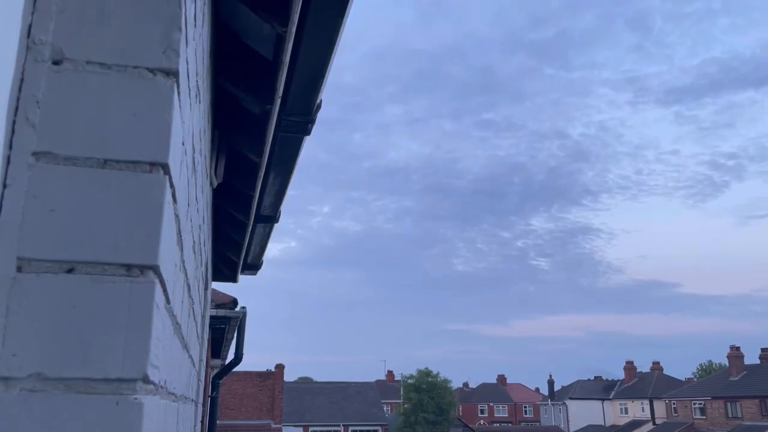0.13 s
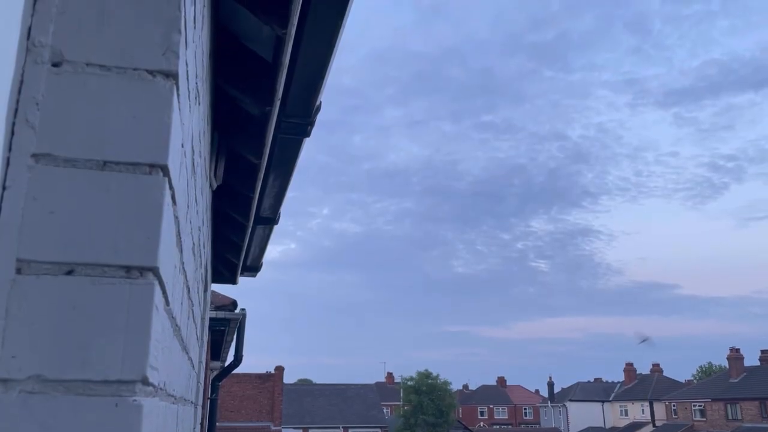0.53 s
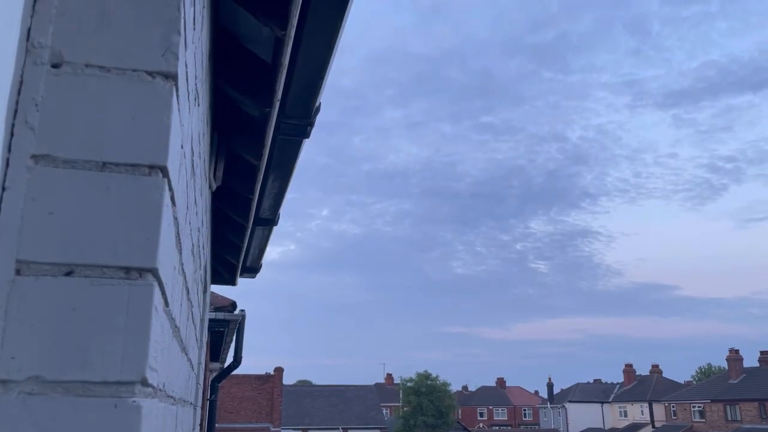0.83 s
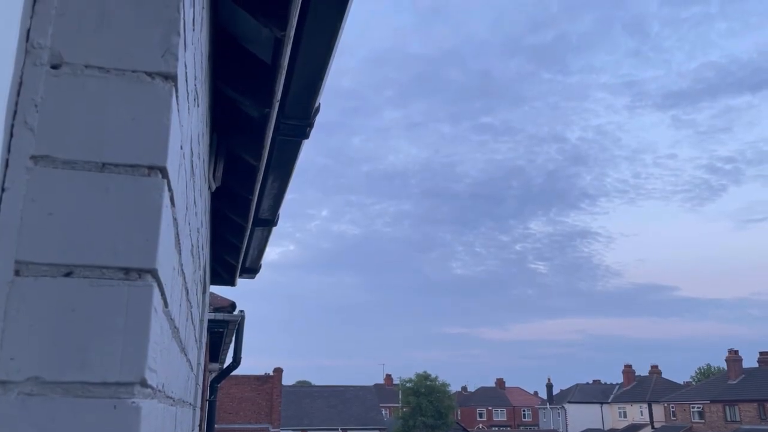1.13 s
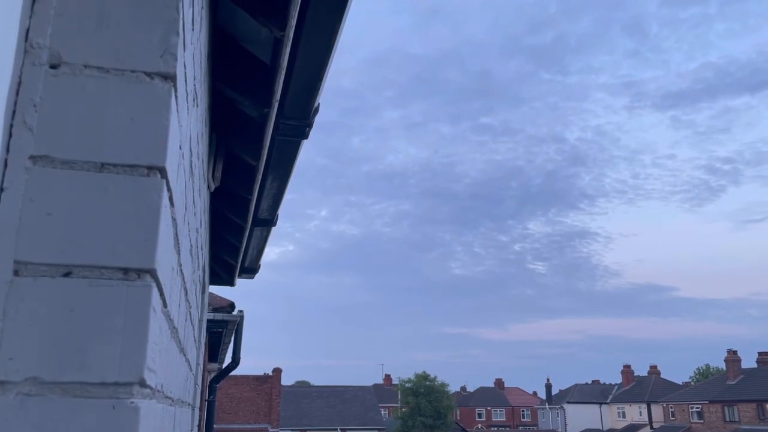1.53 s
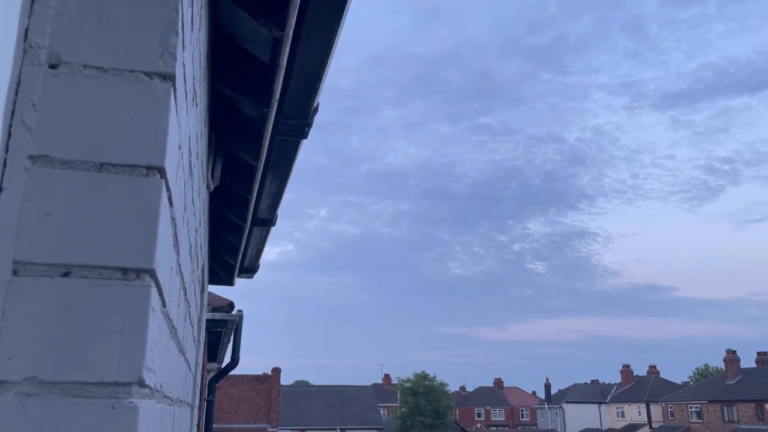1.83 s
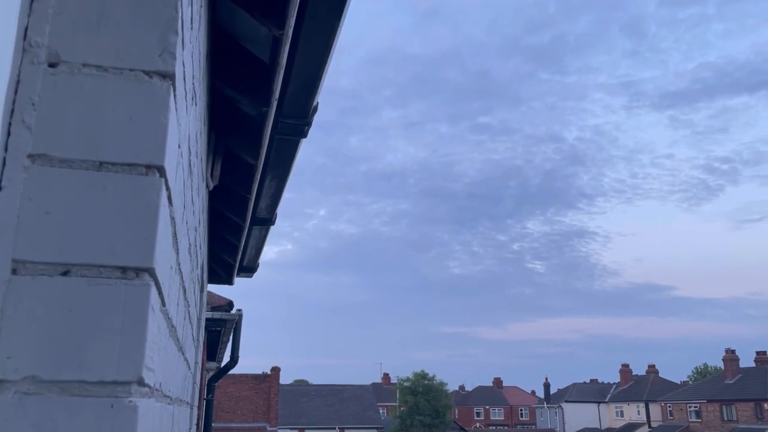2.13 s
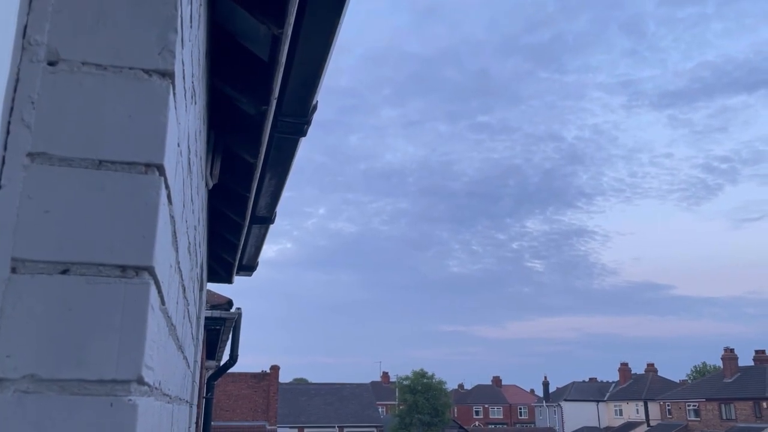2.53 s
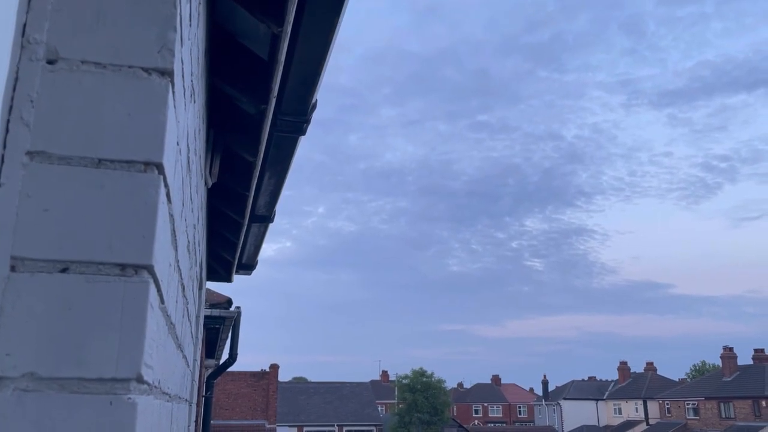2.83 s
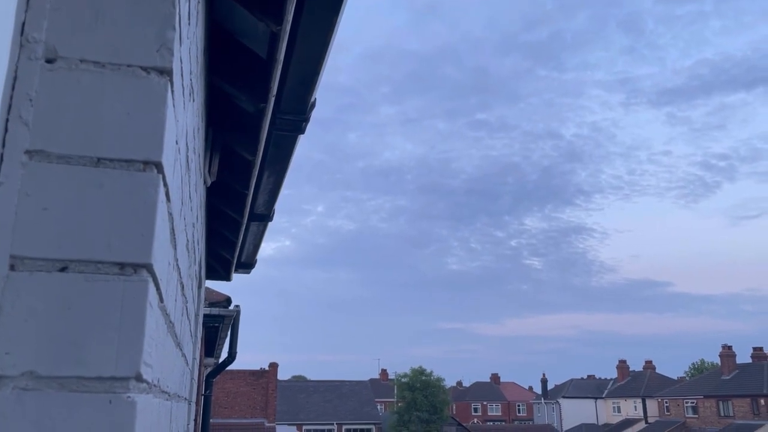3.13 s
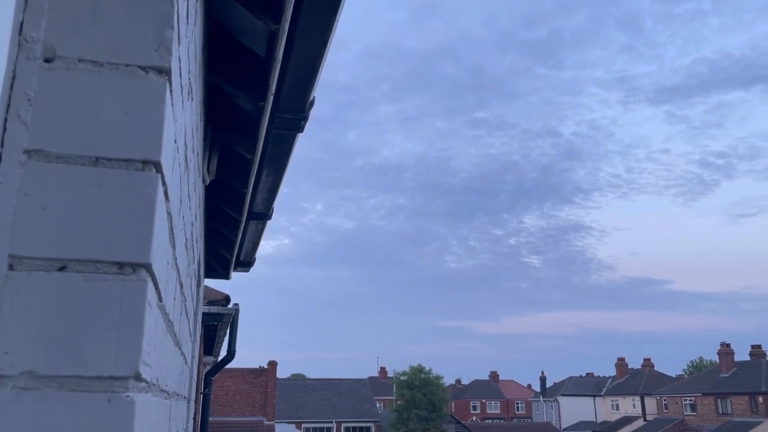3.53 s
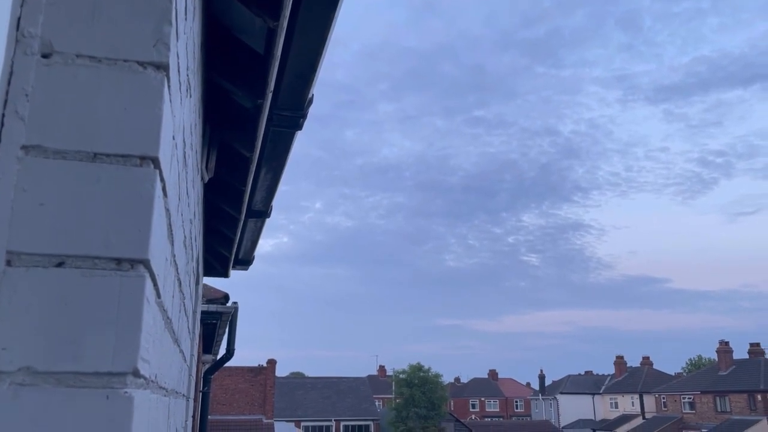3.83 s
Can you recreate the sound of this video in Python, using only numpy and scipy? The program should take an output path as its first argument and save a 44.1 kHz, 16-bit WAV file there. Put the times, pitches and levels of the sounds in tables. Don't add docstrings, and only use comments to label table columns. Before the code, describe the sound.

A near swift gives a shrill, buzzing scream from about 0.05 s, breaking into a loud scattered trill until 0.4 s, with an airy wing whoosh. A second, thinner scream starts at 0.46 s and falls in an even, rapid trill by 0.8 s, echoing off walls. Then quiet: low town rumble, a far engine, very faint bird pipes around 1.4-2.4 s, wind puffs, and a faint low vehicle note near 3.6 s.

```python
import sys
import numpy as np
from scipy import signal
from scipy.io import wavfile
from scipy.ndimage import uniform_filter1d

SR = 44100
rng = np.random.default_rng(int(sys.argv[2]) if len(sys.argv) > 2 else 0)


def to_wav(s):
    ch = np.atleast_2d(s).T
    pcm = np.round(np.clip(ch, -1, 1) * 32767)
    wavfile.write(sys.argv[1], SR, pcm.astype(np.int16))


def boost_factor(decibels):
    exponent = np.asarray(decibels, float) / 20
    return 10 ** exponent


N = 176400

OPEN_DB_PER_KHZ = 9
SIDES = np.array([[.5], [-.5]])


def evened(x):
    return x / np.sqrt(np.mean(x ** 2) + 1e-20)


def read(points, hz):
    f, value = np.transpose(points)
    return np.interp(np.log(hz + 1), np.log(f + 1), value)


def along(points):
    s, value = np.transpose(points)
    return np.interp(np.arange(N) / SR, s, value)


def add(mix, s, sound):
    part = mix[:, round(s * SR):][:, :sound.shape[1]]
    part += sound[:, :part.shape[1]]


def drift(count, size):
    return evened(uniform_filter1d(uniform_filter1d(rng.standard_normal(count), size), size))


def band_noise(order, band_hz, shape):
    band = signal.butter(order, band_hz, "bandpass", fs=SR, output="sos")
    return evened(signal.sosfilt(band, rng.standard_normal(shape)))


def air(tone, patchy_db, size):
    # f/Hz, correlation [-1..1]
    likeness = [(60, 0.67), (150, 0.87), (380, 0.56), (950, -0.23), (2380, 0.1), (5980, 0.03),
                (15000, 0.84)]
    # f/Hz, L-R level/dB
    balance = [(60, 0.5), (180, 2.5), (550, 1.5), (1650, 1.4), (4970, -1.5), (15000, -1)]
    frames, hz = 4 * N // size + 5, np.fft.rfftfreq(size, 1 / SR)
    a, b, c, d, patches = rng.standard_normal((frames, len(hz), 5)).T
    patches = uniform_filter1d(patches, size // 128, 0)
    patches = evened(uniform_filter1d(patches, 12288 // size, 1))

    same = np.clip(read(likeness, hz), -1, 1)[:, None]
    tilt_db = read(balance, hz)[:, None] / 2
    left = a + 1j * b
    right = same * left + np.sqrt(1 - same ** 2) * (c + 1j * d)
    inside = ((hz >= tone[0][0]) & (hz <= tone[-1][0]))[:, None]
    z = np.array([left * boost_factor(tilt_db), right * boost_factor(-tilt_db)])
    z = z * boost_factor(read(tone, hz)[:, None] + patchy_db * patches) * inside
    return evened(signal.istft(z, nperseg=size, noverlap=3 * size // 4)[1][:, :N])


def earlier_calls():
    level_db, t60_s = -60, .3
    decay_db = level_db - 60 * np.arange(N) / SR / t60_s
    return band_noise(4, (3600, 6600), (2, N)) * boost_factor(decay_db)


def wing_rush():
    # t/s, level/dB
    rush = [(0, -69.5), (.3, -62), (.5, -68.5), (.75, -71), (1.1, -85.5)]
    # f/Hz, density/dB
    rush_tone = [(290, -50), (500, -23.5), (561, -17.5), (689, -1.5), (1500, -8.5), (4200, -14),
                 (5460, -38), (9240, -120)]
    passing = np.arange(N) / SR < rush[-1][0]
    return air(rush_tone, patchy_db=4.0, size=1024) * boost_factor(along(rush)) * passing


def town():
    # f/Hz, density/dB
    town_tone = [(53, -31.5), (90, -3.5), (146, -8), (291, -13), (374, -16.5), (479, -16.5), (589, -20),
                 (984, -21), (3000, -48.5), (3900, -82), (6600, -120)]
    # t/s, level/dB
    swell = [(0, -8.5), (.3, -1), (2, 0), (3.3, 0.5), (3.75, 1.5), (4, 1)]
    return boost_factor(-58.5 + along(swell)) * air(town_tone, patchy_db=2.0, size=4096)


def far_engine():
    # f/Hz, level/dB
    drone = [
        (118, -66),
        (233, -76.5),
    ]
    out = np.zeros((2, N))
    for hz, db in drone:
        phase = 2 * np.pi * np.cumsum(hz * (1 + 0.044 * drift(N, size=3000))) / SR
        out = out + boost_factor(db + 3.0 * drift(N, size=2500) + 3 * SIDES) * np.sin(phase)
    return out


def wind_rumble():
    # f/Hz, density/dB
    low_tone = [(8.8, -43.5), (15, -17), (54, -6.5), (110, -9.5), (140, -34.5), (240, -120)]
    # t/s, level/dB
    gusts = [(0, -103.5), (.5, -66.5), (.8, -60.5), (2, -67.5), (2.5, -69), (3.4, -64.5), (4, -58.5)]
    gust_db = 1.5 + along(gusts) + 2.0 * drift(N, size=1500)
    return air(low_tone, patchy_db=1.0, size=4096) * boost_factor(gust_db)


def hiss():
    # f/Hz, density/dB
    hiss_tone = [(1760, -31.5), (3000, -1.5), (5800, -6), (6950, -2.5), (8000, -8.5), (8580, -18),
                 (10100, -4), (12500, -21), (16000, -21.5)]
    return boost_factor(-89) * air(hiss_tone, patchy_db=-0.7, size=1024)


def songbird():
    # t/s, length/s, level/dB, start f/Hz, end f/Hz
    song = [(.03, .012, -70, 4100, 3900), (.093, .012, -63, 4000, 3600), (.098, .01, -66, 2850, 2700),
            (1.43, .12, -88, 2500, 2450), (1.55, .05, -87, 2350, 2300), (1.67, .11, -83, 2350, 2450),
            (1.91, .06, -88, 2100, 2000), (2.3, .07, -87, 2120, 2100), (2.31, .08, -84, 1850, 1870),
            (2, .06, -89, 2000, 1950), (1.94, .06, -88, 1850, 1800)]
    out = np.zeros((2, N))
    for s, length_s, db, from_hz, to_hz in song:
        u = np.linspace(0, 1, round(length_s * SR))
        hz = from_hz + (to_hz - from_hz) * u + 70 * drift(9000, size=90)[:len(u)]
        flicker_db = 1.5 * drift(9000, size=300)[:len(u)]
        phase = 2 * np.pi * np.cumsum(hz) / SR + np.array([[0], [.7]])
        add(out, s, boost_factor(db + 6 + flicker_db) * np.sin(np.pi * u) * np.sin(phase))
    return out


def whistle(hz, env, pan_db, half_db, voice, calm_hz):
    half_levels_db = (-7.5, 2, -18.5)
    half_leads_rad = (.5, 1.9, 1.6)
    octave_db, third_db, octave_lead_rad = voice
    count = len(hz)
    phase = 2 * np.pi * np.cumsum(hz) / SR
    tone = env * boost_factor(SIDES * pan_db) * np.sin(phase + SIDES * 1.47)

    open_db = OPEN_DB_PER_KHZ * np.minimum(hz / 1000 - 5.3, 0)
    high_db = 22 * np.maximum(calm_hz / 1000 - 6.1, 0)
    overtone_env = env * boost_factor(open_db - high_db)
    octave_blur = .6 * drift(2000 + count, size=64)[:count]
    third_blur = .55 * drift(2000 + count, size=24)[:count]
    octave = np.sin(2 * phase + SIDES * octave_lead_rad + octave_blur)
    third = np.sin(3 * phase + SIDES * .6 + third_blur)
    tone = tone + overtone_env * (boost_factor(octave_db) * octave + boost_factor(third_db) * third)

    waver_rad = .3 * drift(4000 + count, size=120)[:count]
    calm = 2 * np.pi * np.cumsum(calm_hz) / SR
    for k, (db, lead_rad) in enumerate(zip(half_levels_db, half_leads_rad)):
        partial = np.sin((k + .5) * calm + (1 + k) * waver_rad + SIDES * lead_rad)
        tone = tone + env * boost_factor(half_db + db) * partial
    return tone


def scream(rows, voice):
    s, *cols = np.transpose(rows)
    t = np.arange(s[0], s[-1], 1 / SR)
    db, hz, pan_db, depth, half_db = (np.interp(t, s, c) for c in cols)
    first_hz, last_hz, breath_db = voice[3:]

    buzz_hz = np.linspace(first_hz, last_hz, len(t)) * (1 + .09 * drift(len(t), size=300))
    buzz = 2 * np.pi * np.cumsum(buzz_hz) / SR
    depth = np.clip(depth, 0, 1)
    pulse = .8 * np.cos(buzz) + .3 * np.cos(2 * buzz + 1.1 * drift(len(t), size=500))
    shimmer_db = 1.9 * drift(len(t), size=200)
    env = boost_factor(db + 4.5 + shimmer_db) * (1 + depth * pulse) / np.sqrt(1 + depth ** 2 / 2)
    env = env * np.clip(np.minimum(t - s[0], s[-1] - t) / 0.001, 0, 1)

    fluttered_hz = hz + 130 * np.sin(buzz + 0.4) + 50 * drift(len(t), size=60)
    calm_hz = hz + .6 * (fluttered_hz - hz)
    growth_db = np.linspace(-36, 0, len(t))
    breath = band_noise(4, (6100, 8300), (2, len(t))) * env * boost_factor(breath_db + growth_db)
    return s[0], whistle(fluttered_hz, env, pan_db, half_db, voice[:3], calm_hz) + breath


def trill_note(row, manner, voice):
    s, db, hz, pan_db, length_s = row
    glide_hz, jitter_hz, half_db, rasp_db, rise_s = manner
    hold_s, fade_db_per_s = .005, 1200
    u = np.linspace(0, 1, round(max(length_s, .003) * SR))
    ends = np.clip(np.minimum(u, 1 - u) * length_s / rise_s, 0, 1) ** 1.4
    fade_db = -fade_db_per_s * np.maximum(u * length_s - hold_s, 0) * (length_s > .01)
    env = boost_factor(db) * ends * boost_factor(fade_db)

    bend_hz = hz + glide_hz * (u - .5) + jitter_hz * drift(2000, size=20)[:len(u)]
    rasp_db = rasp_db + OPEN_DB_PER_KHZ * min(hz / 1000 - 5.5, 0)
    rasp = band_noise(3, (4600, 8200), 2000)[-len(u):] * boost_factor(rasp_db) * env
    tone = whistle(bend_hz, env, pan_db, half_db - 12 * (1 - u), voice, bend_hz)
    return s - .001, tone + rasp * boost_factor(SIDES * pan_db)


def first_swift():
    # t/s, level/dB, f/Hz, L-R level/dB, buzz depth [0..1], half-pitch level/dB
    scream_rows = [
        (.044, -55.5, 4960, 5, .3, -59.5),
        (.057, -39, 5530, 5, 0, -68),
        (.09, -35.5, 5480, 7.5, 0.62, -72),
        (.125, -34, 5714, 2, 0.7, -72),
        (.15, -34, 5633, -3, .75, -70),
        (.222, -31.5, 5440, 0.5, 0.74, -52),
        (.228, -45.5, 4940, 5, 0.5, -48),
    ]
    # octave/dB, third/dB, octave lead/rad, first buzz/Hz, last buzz/Hz, breath/dB
    scream_voice = (-11.5, -28.5, 1.0, 277.5, 241.5, -46)
    # t/s, peak/dB, f/Hz, L-R level/dB, length/s
    trill_rows = [
        (0.2408, -33, 4900, -1.5, 0.0037),
        (0.242, -25.5, 5740, -3.5, 0.0065),
        (0.2658, -19, 5977, -4, 0.0084),
        (0.2745, -30, 6800, -10.5, 0.0045),
        (0.291, -34, 7450, -7.5, 0.0024),
        (0.2913, -23.5, 5817, -6, 0.0076),
        (0.3197, -24, 5420, -2.5, 0.017),
        (0.348, -37, 4460, -21.5, .013),
        (0.367, -42, 4250, 18, 0.016),
        (0.374, -42.5, 3710, -4, 0.0053),
    ]
    # glide/Hz, jitter/Hz, half-pitch/dB, rasp/dB, rise/s
    trill_manner = (198.5, 50, -39, -25, .0015)
    # octave/dB, third/dB, octave lead/rad
    trill_voice = (-10.5, -49, 1.3)
    out = np.zeros((2, N))
    add(out, *scream(scream_rows, scream_voice))
    for row in trill_rows:
        add(out, *trill_note(row, trill_manner, trill_voice))
    return out


def tail(t60_s, start_s, share):
    t = np.arange(SR) / SR
    signs = rng.choice([-1., 1.], (2, SR))
    struck = rng.random((2, SR)) < share
    reflections = signs * struck * boost_factor(-60 * t / t60_s) * (t > start_s)
    return reflections / np.linalg.norm(reflections[0])


def with_echoes(calls):
    # delay/s, left level/dB, right level/dB
    wall = [
        (.0021, -19.5, -23.5),
        (.0047, -18, -14.5),
    ]
    near_db, street_db, houses_db, houses_s = -13.5, -18, -31, .165
    out = calls.copy()
    for delay_s, left_db, right_db in wall:
        add(out, delay_s, calls[::-1] * boost_factor(np.array([[left_db], [right_db]])))
    street = tail(.65, .02, share=.006)
    street[:, round(houses_s * SR)] += boost_factor(houses_db - street_db)
    dull_street = signal.sosfilt(signal.butter(4, 5600, fs=SR, output="sos"), street)
    room = boost_factor(near_db) * tail(.1, .003, share=.06) + boost_factor(street_db) * dull_street
    return out + signal.fftconvolve(calls, room, axes=1)[:, :N]


def treble_spill():
    start_s, length_s, level_db = .2645, .009, -58.5
    out = np.zeros((2, N))
    burst = band_noise(4, (12500, 16000), (2, 2000))[:, -round(length_s * SR):]
    add(out, start_s, boost_factor(level_db) * burst)
    return out


def wing_whoosh():
    peak_s, spread_s, level_db, centre_hz, width_hz = 0.4005, 0.022, -55.5, 1677, 410
    t = np.arange(N) / SR
    band_hz = (centre_hz - width_hz / 2, centre_hz + width_hz / 2)
    band = signal.butter(2, band_hz, "bandpass", fs=SR, output="sos")
    a, b = rng.standard_normal((2, N))
    hollow = evened(signal.sosfilt(band, np.array([a + 0.37 * b, a - 0.45 * b])))
    bump = np.exp(-.5 * ((t - peak_s) / spread_s) ** 2)
    return hollow * boost_factor(level_db - 3 * SIDES) * bump


def second_swift():
    # t/s, level/dB, f/Hz, L-R level/dB, buzz depth [0..1], half-pitch level/dB
    scream_rows = [
        (.461, -47, 4950, 5, 0.27, -44),
        (.472, -53.5, 5815, -2, .3, -24),
        (.49, -49, 5600, 6, 0.13, -33),
        (.511, -49.5, 5310, 13, 0.16, -7),
        (.53, -42, 5460, 2, 0.13, -30),
        (.572, -40, 5506, -5, .35, -42),
        (.595, -41.5, 5430, -2, 0.37, -18),
        (.65, -47, 5380, 10, 0.78, -41),
        (.672, -50, 5310, 6, .8, -21),
    ]
    # octave/dB, third/dB, octave lead/rad, first buzz/Hz, last buzz/Hz, breath/dB
    scream_voice = (-18, -31, .6, 258.5, 244.5, -17)
    # t/s, peak/dB, f/Hz
    trill_rows = [(.677, -33, 5220), (0.69, -32.5, 5270), (.702, -29, 5310), (0.715, -28.5, 5220),
                  (0.7282, -28.5, 5120), (0.7407, -28, 5034), (.754, -28.5, 4900), (.767, -31.5, 4653),
                  (0.78, -35, 4544), (0.795, -45.5, 4440), (0.808, -60, 4050), (0.817, -70, 3700)]
    # glide/Hz, jitter/Hz, half-pitch/dB, rasp/dB, rise/s
    trill_manner = (-120, 35, -22, -33, .0028)
    # octave/dB, third/dB, octave lead/rad
    trill_voice = (-18.5, -39, 1)
    pan_db, note_s = 1, 0.0067
    out = np.zeros((2, N))
    add(out, *scream(scream_rows, scream_voice))
    for row in trill_rows:
        add(out, *trill_note((*row, pan_db, note_s), trill_manner, trill_voice))
    return out


def wind_puffs():
    # t/s, level/dB
    thumps = [(0.689, -52), (0.837, -46), (1.189, -53), (1.587, -42), (2.349, -44.5), (2.449, -44),
              (2.547, -45.5), (2.639, -44), (3.188, -46.5), (3.669, -39.5), (3.867, -43), (3.969, -45.5)]
    out = np.zeros((2, N))
    for (s, db), (pitch, lead_rad) in zip(thumps, rng.uniform(-0.28, 1, (len(thumps), 2))):
        puff_hz = 62.4 * (1 + .2 * pitch)
        u = np.linspace(0, 1, round(2.53 / puff_hz * SR))
        cycles = np.sin(2 * np.pi * 2.48 * u + SIDES / 2 * lead_rad)
        add(out, s, boost_factor(db - 2.5) * np.sin(np.pi * u) ** 2 * cycles)
    return out


def far_taps():
    # t/s, level/dB
    ticks = [
        (1.305, -82),
        (2.064, -80),
        (3.994, -70),
    ]
    out = np.zeros((2, N))
    for s, db in ticks:
        decay_db = db - 60 * np.arange(900) / SR / 0.026
        add(out, s, boost_factor(decay_db) * band_noise(2, (1300, 4000), (1, 900)))
    return out


def vehicle_note():
    # t/s, length/s, f/Hz, level/dB
    honk = [
        (3.61, .16, 360, -66),
    ]
    s, length_s, hz, db = honk[0]
    t = np.arange(N) / SR
    beats = np.sin(2 * np.pi * np.clip((t - s) / length_s, 0, 1))
    phase = 2 * np.pi * np.cumsum(hz + 12 * drift(N, size=900)) / SR
    return boost_factor(db) * beats * np.sin(phase)


def scene():
    birds = with_echoes(first_swift() + second_swift()) + earlier_calls() + treble_spill() + songbird()
    flight = wing_rush() + wing_whoosh()
    street = town() + far_engine() + vehicle_note() + far_taps()
    return birds + flight + street + wind_rumble() + wind_puffs() + hiss()


def masked(x):
    # f/Hz, level under call/dB
    threshold = [(3000, -46), (4000, -50), (6500, -40), (9000, -40), (13000, -43), (16000, -50)]
    mid_side = np.array([x[0] + x[1], x[0] - x[1]]) / 2
    hz, _, z = signal.stft(mid_side, SR, nperseg=512, noverlap=384)
    power = uniform_filter1d(uniform_filter1d(abs(z) ** 2, size=6, axis=1), size=5, axis=2)
    call = power[:, hz > 4000].max(axis=(0, 1))
    audible = power > call * boost_factor(2 * read(threshold, hz))[:, None]
    keep = audible | (hz < threshold[0][0])[:, None]
    gate = uniform_filter1d(keep * 1., size=3, axis=2)
    mid, side = signal.istft(z * gate, SR, nperseg=512, noverlap=384)[1][:, :N]
    return np.array([mid + side, mid - side])


def band_limit(x):
    return signal.sosfilt(signal.butter(12, 16780, fs=SR, output="sos"), x)


def record(dry):
    edge = signal.firwin(511, 15900, window=("kaiser", 9), fs=SR)
    mix = masked(signal.oaconvolve(dry, edge[None], "same"))
    return band_limit(mix)


dry = scene()
out = record(dry)
to_wav(out)
```